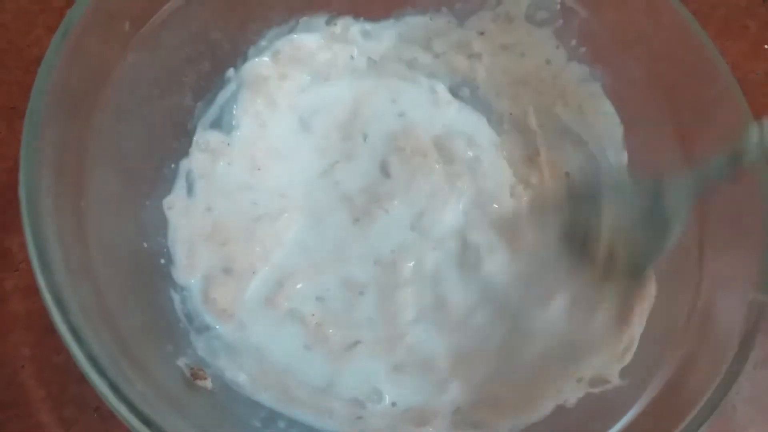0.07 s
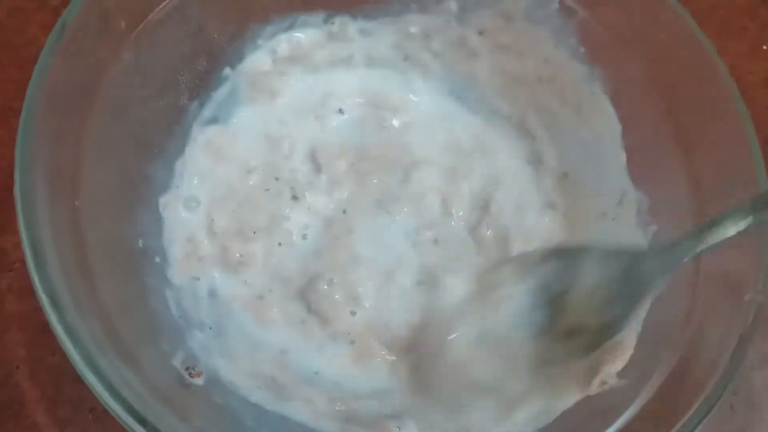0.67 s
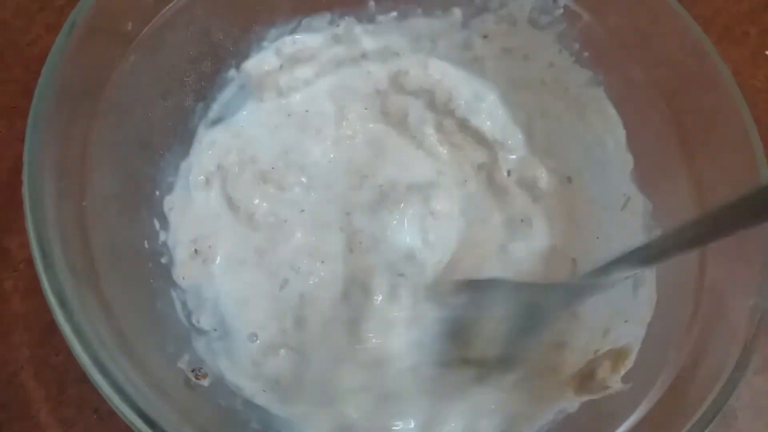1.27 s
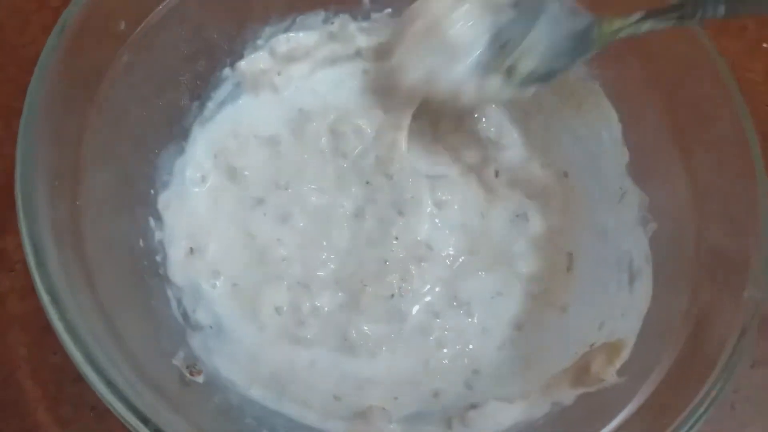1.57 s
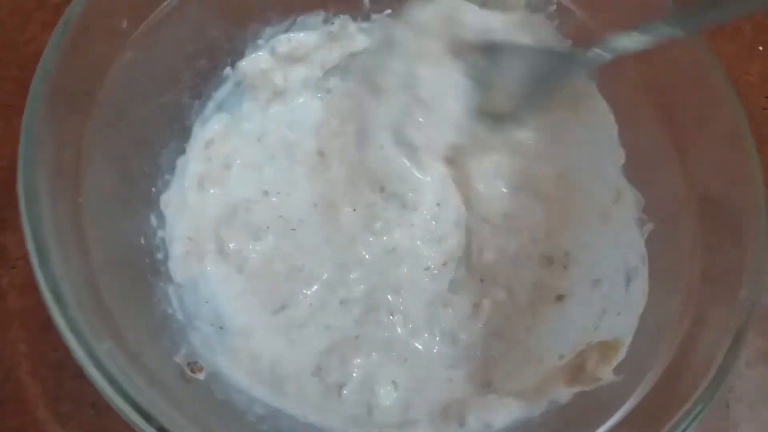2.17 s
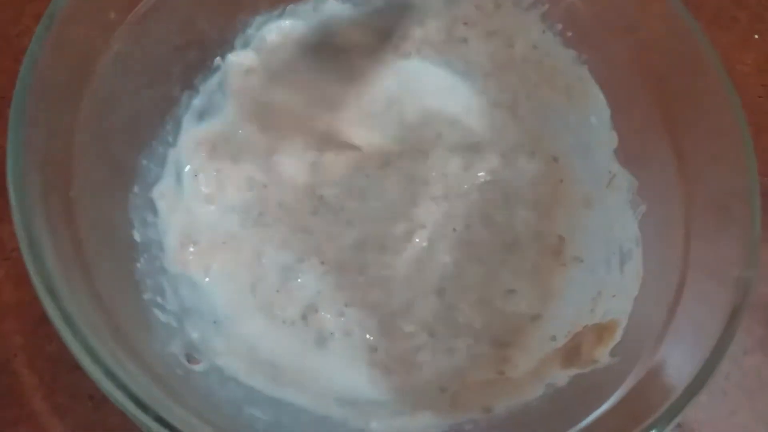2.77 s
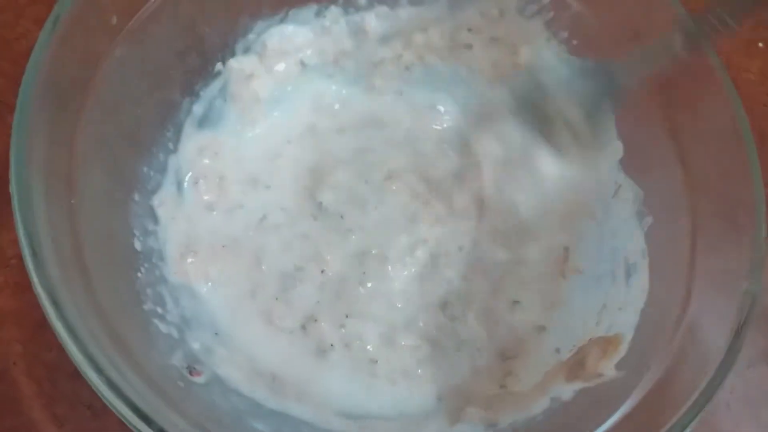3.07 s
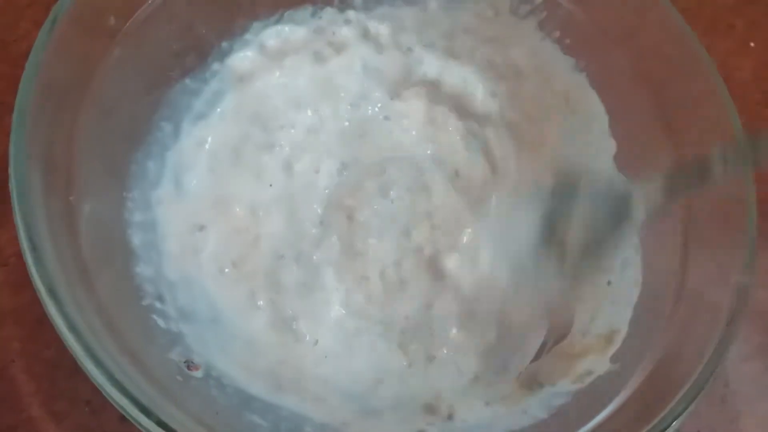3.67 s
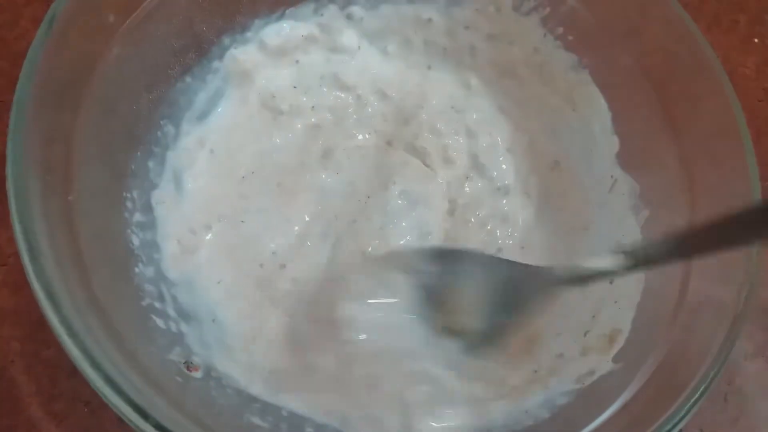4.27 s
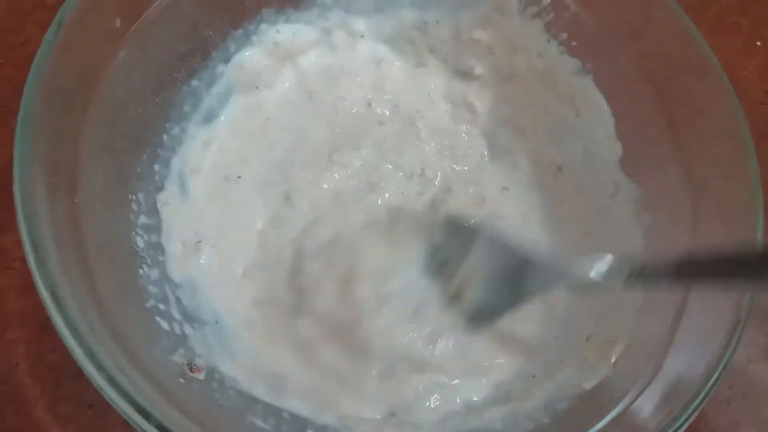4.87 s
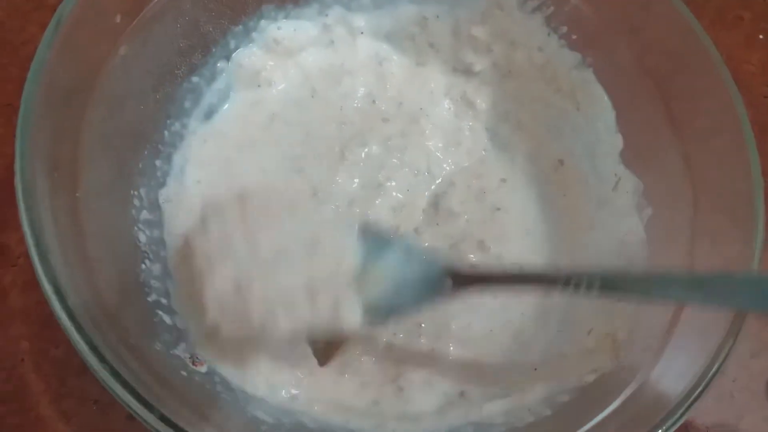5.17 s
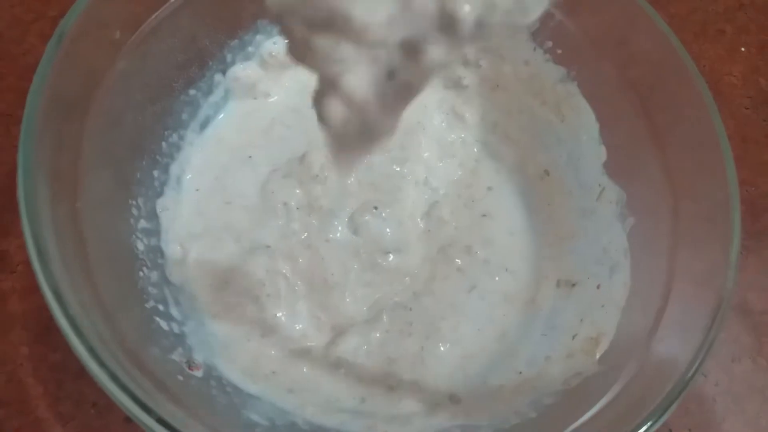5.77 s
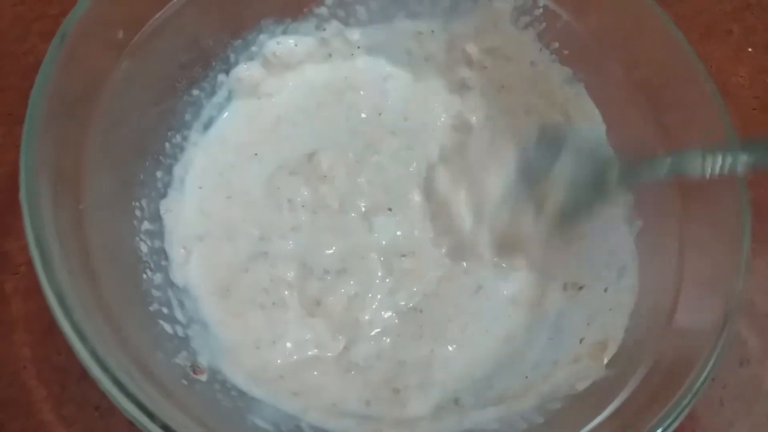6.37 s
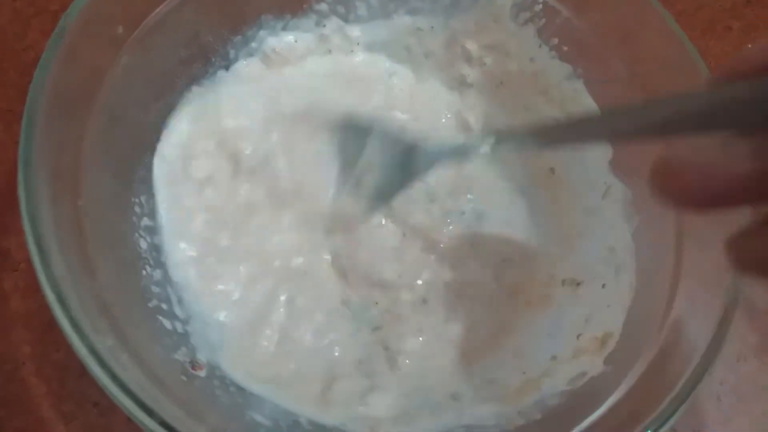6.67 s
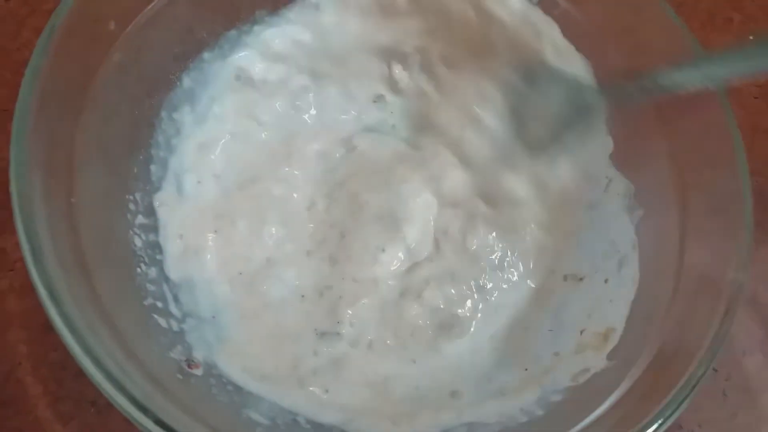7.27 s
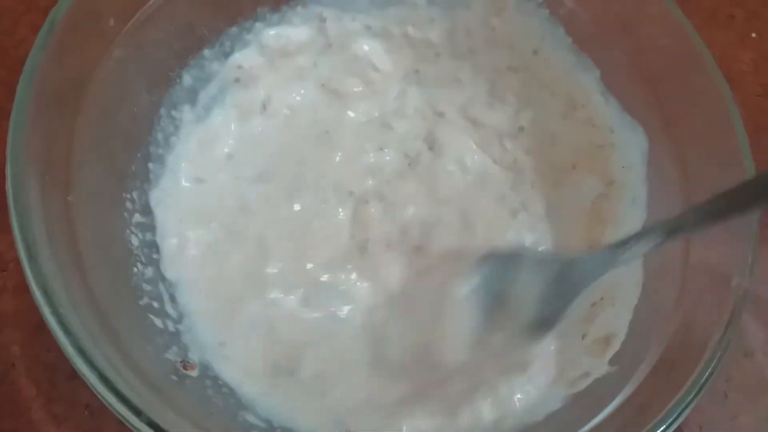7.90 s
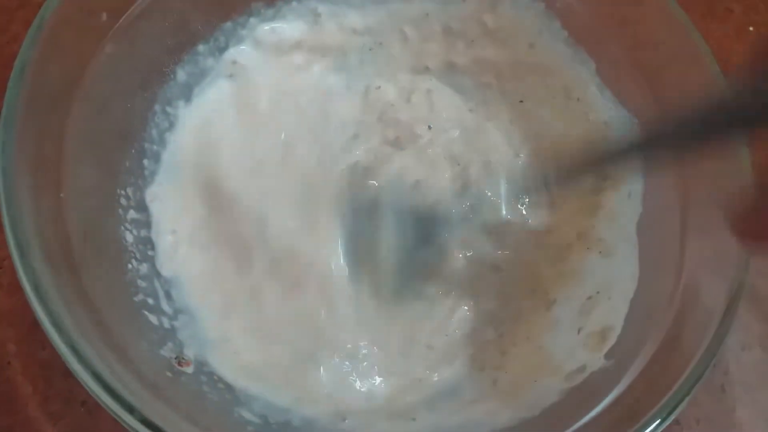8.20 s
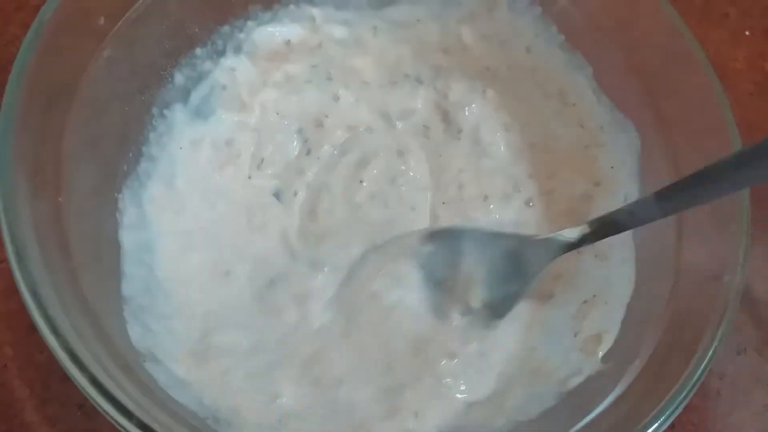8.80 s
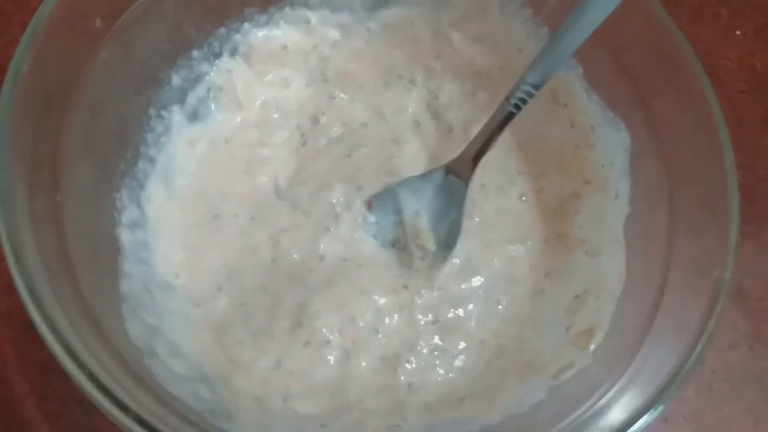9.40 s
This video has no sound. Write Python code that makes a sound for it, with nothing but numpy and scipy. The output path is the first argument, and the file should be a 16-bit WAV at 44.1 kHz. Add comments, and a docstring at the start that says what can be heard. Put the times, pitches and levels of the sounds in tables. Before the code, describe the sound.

A metal spoon stirs thick sauce in a glass bowl, heard close up in a small kitchen. Short wet scrapes mix with dull knocks, ringing clinks and small slurps and plops, and the bowl sometimes bumps the table. The stirring stops for about a second just past halfway, then resumes busily until the spoon chatters lightly to rest. A faint appliance hum runs underneath.

```python
"""A small kitchen, close on a glass bowl of thick sauce being stirred with a metal spoon.
The spoon sticks and slips along the wall, knocks dully under the sauce and clinks on bare glass,
which rings; let go, it chatters to rest. Heavy pushes bump the bowl on the table. The sauce
crackles, slurps and plops as wet films tear, gaps narrow or widen and air pockets close.
Underneath sits a faint bed of appliance hum and air."""
import sys
import numpy as np
from scipy import signal
from scipy.fft import rfft, irfft, next_fast_len
from scipy.io import wavfile
from scipy.ndimage import uniform_filter1d, map_coordinates

SR = 44100
rng = np.random.default_rng(int(sys.argv[2]) if len(sys.argv) > 2 else 0)


def unload_wav(signal):
    """Save mono or channel-first audio to the path in sys.argv[1] as 16-bit WAV at rate SR, clipped to [-1, 1]."""
    wavfile.write(
        sys.argv[1],
        SR,
        np.round(np.clip(np.atleast_2d(signal).T, -1, 1) * 32767).astype(np.int16),
    )


N = 416304
TIME = np.arange(N) / SR
AGE = np.arange(SR // 2) / SR  # seconds since a contact

# the appliance's motor tones: pitch_hz, level_db
HUM_TONES = [(98, -70.5), (147.5, -66.5), (179.4, -57), (280.5, -64.5), (394, -69), (430, -69.5)]
# slow fader ride on the hum and air: time_s, gain_db
HUM_RIDE = [(0, 2), (1.5, 1), (2.4, -3.5), (4.2, .5), (9.44, 0)]
# tone of the rushing air: frequency_hz, gain_db
AIR_EQ = [(20, -28.5), (36, -26), (46, -2.5), (60, -9), (97, -0.5), (125, -2.5), (200, -0.5), (290, 6),
          (350, -4.5), (700, -6.5), (1000, -19), (2000, -28.5), (5000, -29), (16000, -44)]
# the kitchen's reverb time: frequency_hz, t60_s
ROOM_DECAY = [(200, 0.87), (1500, 0.6), (5000, 0.36), (9000, 0.45), (15000, 0.5)]
# tone of the table's thud: frequency_hz, gain_db
THUD_EQ = [(40, -64.5), (120, -38), (290, 8), (450, 4), (800, 2), (1300, -4), (2500, -37)]
# heavy pushes rock the bowl: start_s, level_db
BUMPS = [(2.923, -22.5), (4.28, -36), (4.819, -33.5), (7.399, -27)]
# air pockets close in the sauce: start_s, level_db, pitch_hz, t60_s
PLOPS = [(1.633, -6, 1270, 0.012), (1.639, -17.5, 760, 0.056), (3.444, -30, 1106, 0.015),
         (6.141, -62.5, 2400, 0.0057), (7.402, -18, 940, 0.025), (7.406, -33, 566, 0.1),
         (8.054, -16, 1100, 0.0097), (8.313, -22.5, 1136, 0.041), (8.901, -19.5, 896, 0.027)]
# sauce is sucked past the spoon: start_s, end_s, level_db, from_hz, to_hz
SLURPS = [(1.331, 1.389, -43, 1786, 1680), (2.399, 2.432, -32, 4290, 4730),
          (3.384, 3.415, -36.5, 3070, 3230), (3.954, 4.031, -39.5, 1507, 1954),
          (4.254, 4.299, -31.5, 2290, 2567), (5.018, 5.101, -39.5, 4560, 2704),
          (6.43, 6.537, -37.5, 3390, 5090), (6.723, 6.74, -40, 1880, 1800), (8.177, 8.225, -31, 4320, 2414),
          (8.265, 8.299, -27.5, 3400, 3100), (8.667, 8.7, -38, 2650, 4620)]
# the bowl's low rim modes: pitch_hz, level_db, t60_s
RIM_MODES = [(647, -8.5, 0.39), (964, -6, 0.096), (1275, -6, 0.17), (1441, -4, 0.63), (1857, -0.5, 0.16),
             (2500, -10, 0.11), (2592, 0.5, 0.27), (4001, -12, 0.5)]
# the bowl's bright upper modes: pitch_hz, level_db, t60_s
UPPER_MODES = [(3994, 4, .15), (4100, -11.5, 0.41), (5670, 0.5, 0.19), (5630, -10, 0.3), (7560, 0, 0.15),
               (7620, -18.5, 0.5), (10100, -12, 0.1), (10980, -21, .14), (11950, -18, .24),
               (13100, -19.5, .13), (14704, -24, .15)]
# tone of the spoon's friction: frequency_hz, gain_db
RASP_EQ = [(40, -67), (150, -39), (350, -6), (600, -6), (900, -1), (1750, -4), (2250, -4), (2900, -1.5),
           (4200, -1.5), (6200, -3), (7700, -9.5), (8900, -18.5), (10500, -18.5), (13600, -17.5),
           (16000, -20)]
# the spoon is drawn along the wall: start_s, end_s, level_db, swell_db, pitch_hz
STROKES = [(0.0, 0.06, -42, -8, 1830), (0.358, 0.372, -40, 15, 2750), (1.254, 1.305, -35.5, 1, 2400),
           (1.766, 1.815, -35, -4, 2620), (1.941, 1.96, -36, -2, 3350), (1.983, 1.993, -43.5, 2.5, 2140),
           (2.072, 2.105, -38, -4.5, 1950), (2.26, 2.388, -45, 6.5, 2700), (2.393, 2.434, -30, -5.5, 4500),
           (2.964, 3.038, -37.5, 5.5, 2450), (3.193, 3.239, -32, 10.5, 2850),
           (3.337, 3.349, -30.5, -4.5, 3120), (3.369, 3.405, -32, 5, 3280), (3.633, 3.764, -41, 10, 2200),
           (3.81, 3.942, -44, -7.5, 2100), (3.943, 4.079, -38.5, -6, 1900), (4.08, 4.242, -39.5, 6.5, 2800),
           (4.257, 4.322, -32, 1.5, 2480), (4.651, 4.744, -35, 7.5, 2900), (4.765, 4.841, -28, 8, 3750),
           (4.855, 5.0, -33.5, -14.5, 3400), (5.011, 5.089, -42, 9.5, 3500), (6.398, 6.421, -33, -10, 3900),
           (6.43, 6.531, -34, -8, 4000), (6.558, 6.593, -31, -8, 4270), (6.707, 6.746, -49.5, -8.5, 1870),
           (6.771, 6.79, -44, -1, 2260), (6.917, 7.025, -37.5, 8.5, 3220), (7.191, 7.233, -34.5, 3, 2310),
           (7.563, 7.701, -35, -6, 3100), (7.736, 7.83, -43, 2, 2900), (7.867, 7.903, -39, -5, 2870),
           (7.96, 8.009, -37, 3.5, 2170), (8.167, 8.314, -33, 9.5, 3450), (8.557, 8.6, -33, -3.5, 2870),
           (8.61, 8.696, -32.5, 16, 3100), (8.735, 8.784, -50, -10.5, 2000), (8.96, 9.095, -44, -6.5, 2600),
           (9.121, 9.319, -54, -3.5, 2400)]
# tone of a hit's body: frequency_hz, gain_db
BODY_EQ = [(60, -63.5), (250, -37.5), (600, -25.5), (1000, -3), (1750, 5), (2150, -2), (2700, -3.5),
           (4200, -1.5), (6500, -3), (7700, -3.5), (8800, -18.5), (16000, -30.5)]
# tone of the bright crack on top of a hit: frequency_hz, gain_db
CRACK_EQ = [(5000, -45), (8800, -13), (10500, 2), (12300, -1.5), (13800, -0.5), (16000, -9.5)]
# the spoon meets glass under the sauce: start_s, level_db, centre_hz, t60_s, rim_ring_db
KNOCKS = [(0.063, -48, 3110, 0.2, -46), (0.124, -38, 3490, 0.037, -49), (0.333, -37, 3040, 0.092, -70),
          (0.712, -32, 2280, 0.021, -52), (0.745, -37.5, 2540, 0.065, -43),
          (0.969, -38, 2420, 0.027, -59.5), (1.331, -21, 2220, .017, -42.5), (1.754, -27, 2580, .06, -44),
          (1.822, -35, 4070, .04, -68), (1.888, -41, 3450, 0.1, -70), (1.908, -27.5, 3780, .015, -68),
          (2.174, -40.5, 2640, 0.12, -54.5), (2.242, -24, 2730, 0.022, -44), (2.290, -35, 3650, .012, -56),
          (2.396, -29, 3770, .02, -42), (2.486, -33, 3320, .03, -57), (2.923, -12, 4500, 0.011, -37),
          (3.337, -37.5, 3500, 0.038, -42.5), (3.795, -32.5, 2420, 0.043, -44),
          (4.249, -16.5, 3200, 0.021, -46.5), (4.278, -30, 2630, 0.0562, -42),
          (4.588, -24.5, 3100, 0.022, -44), (4.640, -36.5, 3050, .045, -64), (4.757, -29.5, 4200, .03, -40),
          (5.114, -36, 5170, .014, -57.5), (6.392, -12, 4640, .012, -52), (6.559, -39.5, 3900, .04, -42),
          (6.729, -38.5, 1980, 0.047, -68), (7.039, -30.5, 2750, .015, -52), (7.531, -28, 3240, 0.017, -53),
          (7.728, -25, 2550, .04, -50), (7.860, -31.5, 3800, 0.043, -48), (7.952, -30, 2880, .025, -56),
          (8.106, -24.5, 3400, 0.019, -43.5), (8.160, -34, 3040, 0.044, -46),
          (8.215, -27, 4040, .11, -62.5), (8.267, -27, 3720, .042, -37.5), (8.313, -40, 1640, 0.022, -46.5),
          (8.577, -27.5, 2840, .03, -41.5), (8.643, -26, 2770, .04, -47), (8.703, -10.5, 4240, .045, -31),
          (8.722, -26, 2560, 0.09, -33), (8.785, -25.5, 2480, 0.023, -45.5)]
# the spoon hits bare glass: start_s, level_db, centre_hz, t60_s, crack_re_body_db,
# upper_ring_db, rim_ring_db
CLINKS = [(1.630, -18, 4430, .12, -2, -18.5, -27.5), (1.667, -30.5, 2580, .033, -9, -26, -28),
          (2.119, -27.5, 4380, .022, -12.5, -41, -47), (3.203, -33.5, 2720, .09, -5.5, -41, -33.5),
          (4.742, -17.5, 4260, .03, -8.5, -32, -45.5), (4.819, -25.5, 4260, .12, -5, -28, -35),
          (5.091, -28.5, 3430, .025, -10, -43, -57), (7.369, -19.5, 5800, 0.022, -16, -35.5, -49),
          (7.399, -35.5, 1890, .12, -16, -35, -47.5), (8.029, -20, 4860, .024, -11.5, -30, -41),
          (8.443, -28, 3360, 0.032, -6, -38, -50), (8.465, -33.5, 4640, 0.079, -6, -33.5, -43),
          (8.887, -16, 2810, .12, -8.5, -23.5, -27), (9.099, -33, 4270, .05, -12, -47.5, -43)]


def amp(db):
    """Decibels to gain."""
    return 10 ** (np.asarray(db) / 20)


def unit(x):
    """Scale to rms 1."""
    return x / np.sqrt(np.mean(x ** 2) + 1e-20)


def curve(points, hz):
    """Read a breakpoint curve on a log frequency axis."""
    point_hz, values = np.transpose(points)
    return np.interp(np.log(hz + 1), np.log(point_hz + 1), values)


def filtered(x, response):
    """Weight x by a function of frequency."""
    size = next_fast_len(len(x) + 2048)
    return irfft(rfft(x, size) * response(np.fft.rfftfreq(size, 1 / SR)), size)[:len(x)]


def equalised(x, eq):
    """Run x through an EQ curve."""
    return filtered(x, lambda hz: amp(curve(eq, hz)))


def noise(eq, size):
    """Coloured noise of rms 1."""
    return unit(equalised(rng.standard_normal(size), eq))


def wobble(rate, size=N):
    """A smooth random curve with rate knots a second."""
    knots = rng.standard_normal(int(size * rate / SR) + 4)
    return map_coordinates(knots, [np.arange(size) * rate / SR])


def patches(shape, cells):
    """Random hills and valleys over frequency and time, smoothed across cells."""
    field = rng.standard_normal(shape)
    for axis, size in enumerate(cells):
        field = uniform_filter1d(uniform_filter1d(field, size, axis), size, axis)
    return unit(field)


def ticks(rate, spread_db):
    """Tiny impulses of uneven strength at random moments, about rate a second."""
    hit = rng.random(N) < rate / SR
    return unit(hit * rng.choice([-1, 1], N) * amp(spread_db * np.minimum(rng.standard_normal(N), 2)))


def bell_eq(hz, centre_hz, octaves, height_db):
    """Gain of a broad resonance: 1 at the peak, height_db lower far away."""
    return amp(height_db * (np.exp(-.5 * (np.log2((hz + 1) / centre_hz) / octaves) ** 2) - 1))


def fade(t60):
    """Exponential decay after a contact; 1 - fade makes an attack."""
    return np.exp(-np.log(1000) * AGE / max(t60, 1e-3))


def add(track, start_s, sound):
    """Lay a sound into the track."""
    part = track[max(round(start_s * SR), 0):][:len(sound)]
    part += sound[:len(part)]


def appliance():
    """The bed: a slightly unsteady motor hum over a soft rush of air."""
    hum = np.zeros(N)
    for hz, db in HUM_TONES:
        level = amp(db + 0.65 * wobble(3))
        hum += level * unit(np.sin(2 * np.pi * hz * TIME + 0.2 * wobble(4)))
    ride = amp(np.interp(TIME, *np.transpose(HUM_RIDE)))
    return ride * (hum + amp(-56) * noise(AIR_EQ, N))


def kitchen_reverb(x):
    """The room return: early reflections off near walls and a diffuse tail."""
    hz, t, spectrum = signal.stft(rng.standard_normal(len(AGE)), SR, nperseg=256)
    decay = amp(-60 * t / curve(ROOM_DECAY, hz)[:, None])
    tail = signal.istft(spectrum * decay, SR, nperseg=256)[1][:len(AGE)] * (1 - fade(0.018))
    early = rng.standard_normal(len(AGE)) * fade(.09) * (1 - fade(.01))
    room = amp(-12) * tail / np.linalg.norm(tail) + amp(-13) * early / np.linalg.norm(early)
    return signal.fftconvolve(x, room)[:N]


def table_thud():
    """The table's short, dull answer to a push."""
    push = rng.standard_normal(len(AGE)) * fade(0.085) * (1 - fade(0.0074))
    thud = equalised(push, THUD_EQ)
    return thud * np.linalg.norm(push) / np.linalg.norm(thud)


def bumps():
    """Low-end weight: the rocking bowl's foot lands on the table."""
    out = np.zeros(N)
    for start_s, db in BUMPS:
        add(out, start_s, amp(db) * table_thud())
    return out


def plops():
    """A closing air pocket rings briefly and bends up in pitch."""
    out = np.zeros(N)
    for start_s, db, hz, t60 in PLOPS:
        pitch_hz = hz * (1 + 0.18 * (.5 - fade(t60)))
        envelope = amp(db) * fade(t60) * (1 - fade(0.0016))
        add(out, start_s, envelope * np.sin(2 * np.pi * np.cumsum(pitch_hz) / SR))
    return out


def slurps():
    """A narrow, sputtering resonance glides as the gap behind the spoon changes size."""
    out = np.zeros(N)
    for start_s, end_s, db, from_hz, to_hz in SLURPS:
        size = max(round((end_s - start_s) * SR), 256)
        width_hz = .33 * np.sqrt(from_hz * to_hz)
        phase = 2 * np.pi * np.cumsum(np.geomspace(from_hz, to_hz, size)) / SR
        hiss = wobble(width_hz, size) * np.sin(phase) + wobble(width_hz, size) * np.cos(phase)
        sputter = amp(4 * wobble(width_hz / 4, size))
        add(out, start_s, amp(db) * unit(hiss * sputter * signal.windows.tukey(size)))
    return out


def bubbles(pitch_at, rate, spread_octaves, cycles):
    """Wet grain: tiny air pockets burst, each ringing a few cycles on a rising note."""
    count = int(rate * N / SR)
    start_s = rng.random(count) * N / SR
    detune, life, strength = np.clip(rng.standard_normal((count, 3)), -2, 2).T[:, :, None]
    hz = np.clip(pitch_at(start_s)[:, None] * 2 ** (spread_octaves * detune), 900, 15500)
    t = AGE[:SR // 100]
    decay = t * hz / (cycles * np.exp(.5 * life))
    envelope = amp(4.8 * strength) * np.exp(-decay) * (1 - np.exp(-8 * decay))
    bend = 1 + .014 * np.minimum(decay, 4)
    grains = envelope * np.sin(2 * np.pi * hz * t * bend)
    samples = (start_s * SR).astype(int)[:, None] + np.arange(len(t))
    return unit(np.bincount(samples.ravel(), grains.ravel(), N)[:N])


def glass_ring(modes, spot_scatter_db=1.5):
    """The bowl's modes, at strengths that vary with the landing spot; shifting sauce makes each waver."""
    tone = np.zeros(len(AGE))
    for hz, db, t60 in modes:
        waver = .5 * wobble(70, size=len(AGE) // 32).repeat(33)[:len(AGE)]
        phase = 2 * np.pi * (hz * AGE + rng.random()) + uniform_filter1d(waver, size=33)
        tone += amp(db + spot_scatter_db * rng.normal()) * fade(t60) * np.sin(phase)
    return tone * (1 - fade(0.0063))


def chatter(start_s=8.9, t60_s=0.84):
    """Ever lighter taps of the settling spoon keep the highest modes shimmering."""
    since_s = TIME - start_s
    taps = ticks(rate=130, spread_db=1.5) * (since_s > 0) * amp(-60 * np.abs(since_s) / t60_s)
    glass = filtered(glass_ring(UPPER_MODES), lambda hz: bell_eq(hz, 11000, octaves=0.76, height_db=13))
    return amp(-37.5) * signal.fftconvolve(taps, glass / np.linalg.norm(glass))[:N]


def singing(rub):
    """Rubbing keeps the bowl's modes ringing softly behind the scrape."""
    glass = glass_ring(RIM_MODES) + amp(0.5) * glass_ring(UPPER_MODES)
    return amp(-18.5) * signal.fftconvolve(rub, glass / np.linalg.norm(glass))[:N]


def stroke_pressure(length_s, db, swell_db, arch_db=3, bite_s=0.0073, lift_s=0.0024):
    """One stroke's envelope: the edge bites, the hand leans in midway as it swells or eases, then lifts."""
    length_s = max(length_s, bite_s)
    progress = np.minimum(AGE / length_s, 1)
    shape_db = swell_db * (progress - .5) + arch_db * (np.sin(np.pi * progress) - 2 / np.pi)
    bite = np.minimum(AGE / bite_s, 1)
    lift = np.clip(1 - (AGE - length_s) / lift_s, 0, 1)
    return amp(db + shape_db) * bite * lift


def rasp(pitch_at, hollow_db=4.1):
    """The spoon's edge sticks and slips, with a pitch that follows the point of contact."""
    slips = ticks(rate=6000, spread_db=5.5) * amp(1.8 * wobble(130))
    hz, t, spectrum = signal.stft(equalised(slips, RASP_EQ), SR, nperseg=256)
    gain = bell_eq(hz[:, None], pitch_at(t), octaves=0.56, height_db=6.5)
    # hollows open and close in the sauce: the colour moves while the level holds
    gain *= amp(hollow_db * patches(spectrum.shape, cells=(2, 6)))
    gain /= np.sqrt(np.average(gain ** 2, axis=0, weights=amp(curve(RASP_EQ, hz)) ** 2))
    return unit(signal.istft(spectrum * gain, SR, nperseg=256)[1][:N])


def scrapes():
    """Strokes along the wall: rasp, squelch and the crackle of wet films all ride the hand's pressure."""
    pressure = np.zeros(N)
    for start_s, end_s, db, swell_db, _ in STROKES:
        add(pressure, start_s, stroke_pressure(end_s - start_s, db, swell_db))
    starts, ends, _, _, pitch_hz = np.transpose(STROKES)
    pitch_at = lambda t: np.interp(t, np.sort(np.append(starts, ends)), pitch_hz.repeat(2))
    friction = rasp(pitch_at)
    squelch = bubbles(pitch_at, rate=520, spread_octaves=.55, cycles=2.1)
    crackle = bubbles(lambda t: np.full(len(t), 12300), rate=320, spread_octaves=0.19, cycles=2.4)
    wet_scrape = .82 * friction + .57 * squelch
    tearing = pressure ** 0.74  # thin films tear even under a light touch
    return amp(-3) * pressure * wet_scrape + amp(-30.5) * tearing * crackle


def spoon_hit(db, centre_hz, t60, crack_db):
    """One hit in three layers: a body of dense damped modes, a bright crack, a thud through the table."""
    # each landing spot favours some resonances and misses others
    knots_hz = np.arange(0, SR / 2, 330)
    spot_db = 3.8 * np.clip(rng.standard_normal(len(knots_hz)), -1.5, 1.5)
    spot = lambda hz: amp(np.interp(hz, knots_hz, spot_db))
    colour = lambda hz: bell_eq(hz, centre_hz, octaves=1.0, height_db=15.5) * spot(hz)
    body = filtered(noise(BODY_EQ, len(AGE)), colour) * fade(t60)
    crack = noise(CRACK_EQ, len(AGE)) * fade(0.7 * t60)
    onset = SR // 200  # the first 5 ms set the level
    clack = amp(db) * (body / body[:onset].std() + amp(crack_db) * crack / crack[:onset].std())
    thud_db = -21.5 + 0.74 * db  # grows more slowly than the clack
    return clack * (1 - fade(.002)) + amp(thud_db) * table_thud()


def knocks():
    """Sauce cushions the spoon: a short clack with a softened crack, and only the rim modes sound on."""
    out = np.zeros(N)
    for start_s, db, centre_hz, t60, rim_db in KNOCKS:
        hit = spoon_hit(db, centre_hz, t60, crack_db=-17)
        add(out, start_s, hit + amp(rim_db) * glass_ring(RIM_MODES))
    return out


def clinks():
    """Metal on bare glass: the whole set of modes rings out."""
    out = np.zeros(N)
    for start_s, db, centre_hz, t60, crack_db, upper_db, rim_db in CLINKS:
        glass = amp(upper_db) * glass_ring(UPPER_MODES) + amp(rim_db) * glass_ring(RIM_MODES)
        add(out, start_s, spoon_hit(db, centre_hz, t60, crack_db) + glass)
    return out


def scene():
    """The mono mix: spoon, bowl and sauce up front, room and hum behind."""
    rub = scrapes()
    bowl = knocks() + clinks() + bumps() + chatter() + rub + singing(rub) + slurps() + plops()
    return (bowl + kitchen_reverb(bowl) + appliance())[None]


def record(dry):
    """The microphone rolls off the deep bass and keeps nothing above its band limit."""
    low_cut_hz, top_hz = 38.0, 16000
    return filtered(dry[0], lambda hz: (hz < top_hz) * hz ** 6 / (hz ** 6 + low_cut_hz ** 6))[None]


dry = scene()
out = record(dry)
unload_wav(out)
```